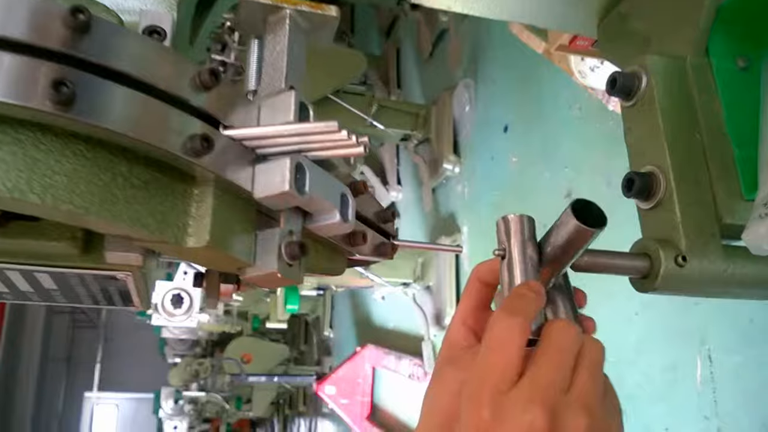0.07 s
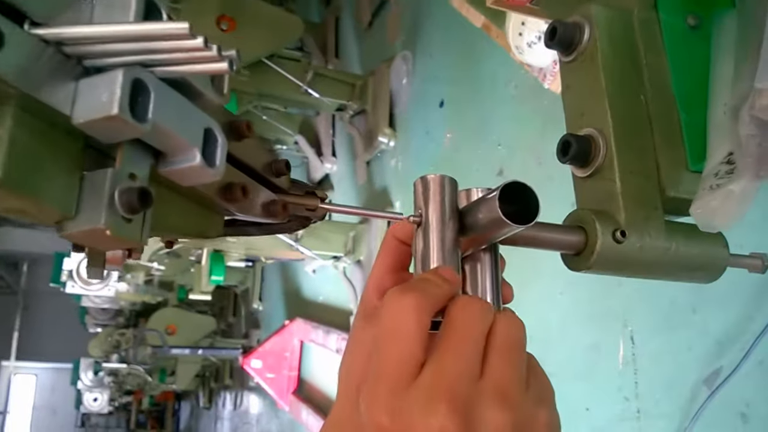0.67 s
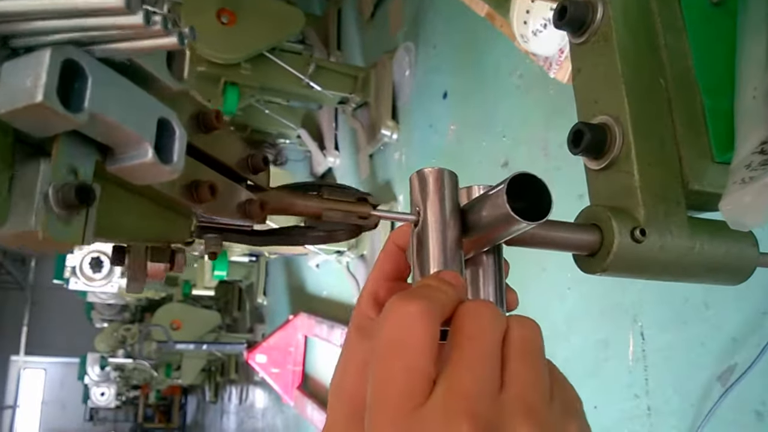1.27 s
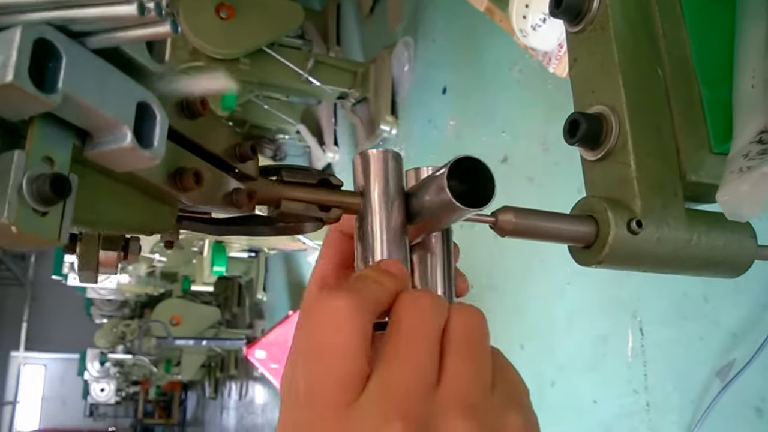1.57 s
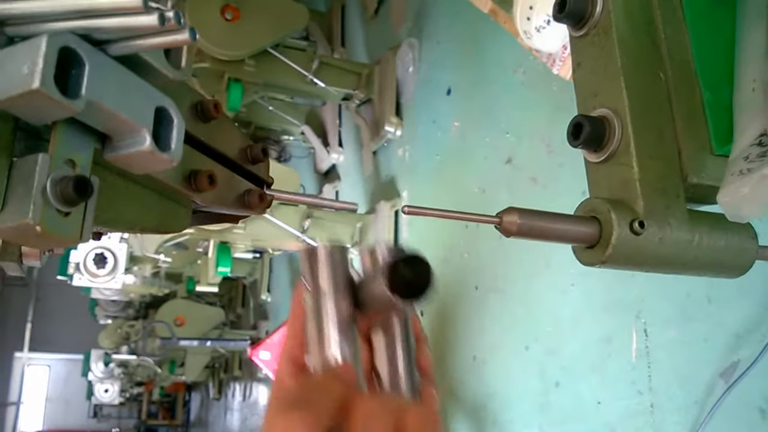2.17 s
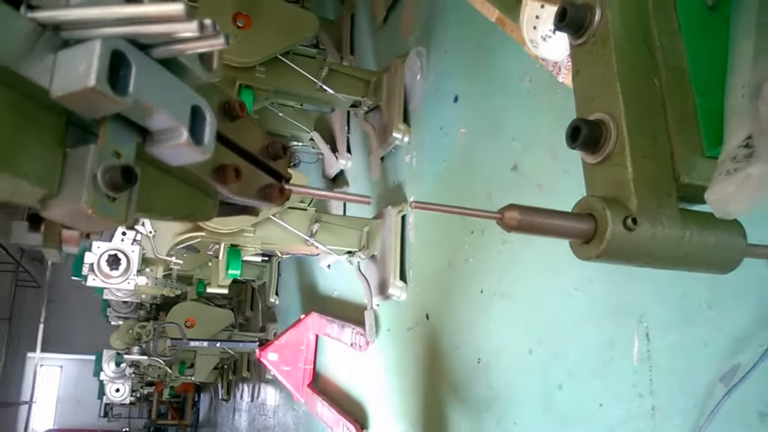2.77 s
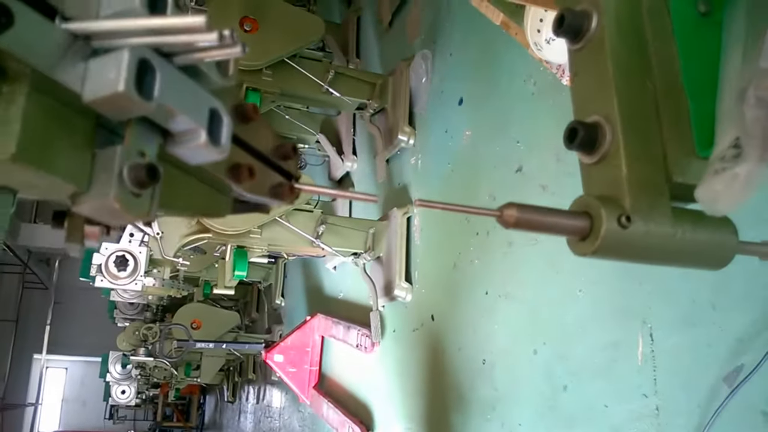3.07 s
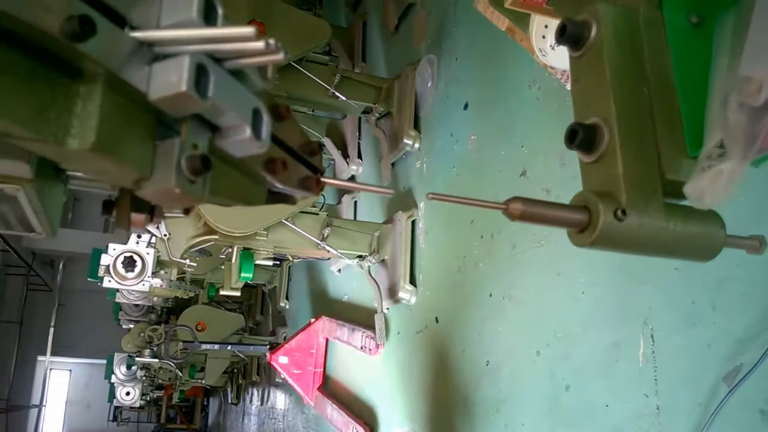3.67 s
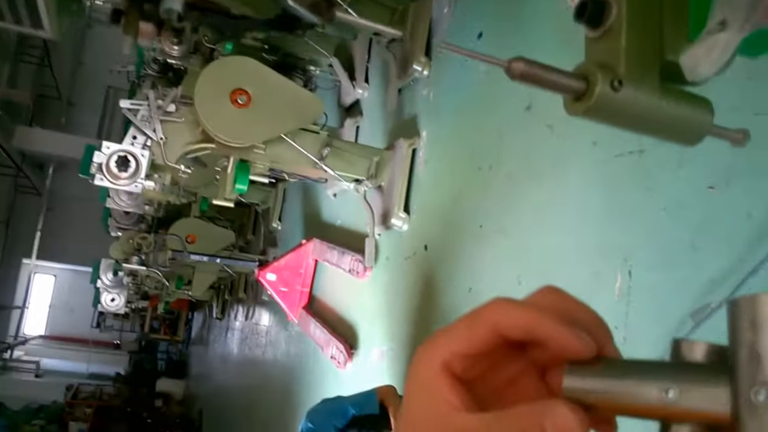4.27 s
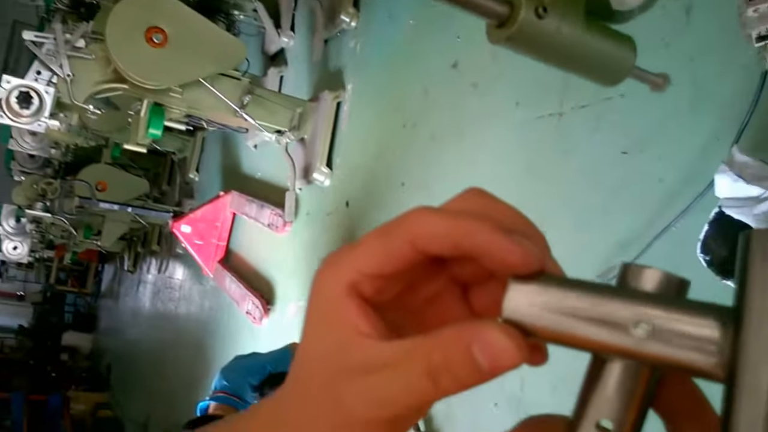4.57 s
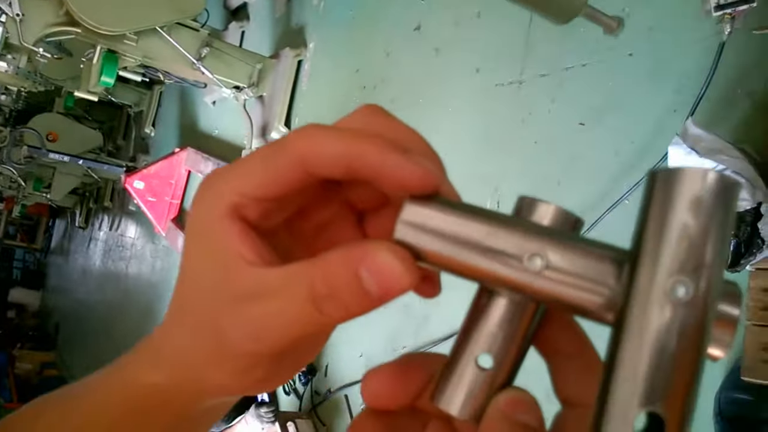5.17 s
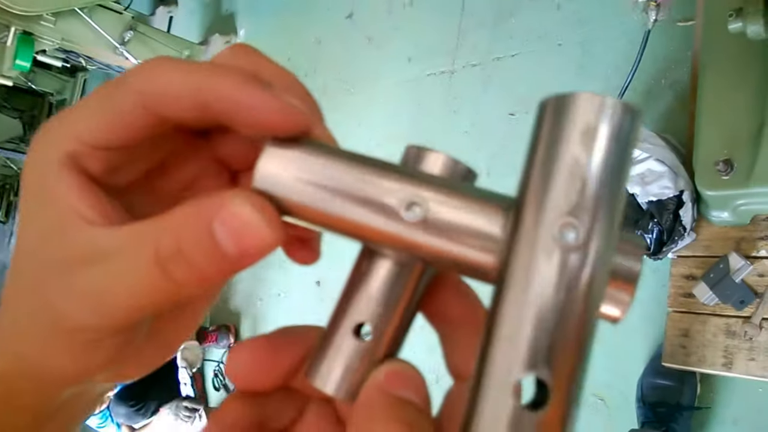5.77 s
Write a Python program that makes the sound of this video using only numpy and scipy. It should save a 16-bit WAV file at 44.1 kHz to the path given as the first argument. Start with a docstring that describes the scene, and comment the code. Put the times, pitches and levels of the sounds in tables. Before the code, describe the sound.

A riveting machine bangs and clatters through one stroke as steel tubes clink, while an angle grinder screeches further off in a workshop.

```python
"""A riveting machine runs through one stroke in a metal workshop: it bangs into motion, blows and loose
parts ring its iron frame, and hand-held steel tubes clink as they come off the pin. Further off an
angle grinder rasps and screeches on steel, slowing as it is pressed down. Two thin squeaks sound, then
the lifted grinder's brief whine. Under it all lie the wash of distant machines and a motor's low hum."""
import sys
import numpy as np
from scipy import signal
from scipy.fft import rfft, irfft
from scipy.io import wavfile
from scipy.ndimage import uniform_filter1d, map_coordinates

SR = 44100
rng = np.random.default_rng(int(sys.argv[2]) if len(sys.argv) > 2 else 0)


def bounce(signal):
    """Save signal as a 16-bit WAV file at the path given by the first command-line argument."""
    frames = np.transpose(np.atleast_2d(signal))
    limited = np.clip(frames, -1, 1)
    pcm = np.round(limited * 32767).astype(np.int16)
    wavfile.write(sys.argv[1], SR, pcm)


N = 265482
TIME_S = np.arange(N) / SR
FREQ_HZ = np.fft.rfftfreq(N, 1 / SR)

# Spindle speed, one list per pass. Each row: time in seconds, speed in turns per second.
SPINDLE_SPEEDS = [
    [(0.0, 115.0), (0.124, 115.0), (0.27, 111.7), (0.38, 111.2), (0.49, 112.7), (0.58, 116.2),
     (0.81, 118.0), (1.3, 119.0), (1.45, 121.0)],
    [(1.87, 138.5), (1.98, 137.2), (2.106, 132.6), (2.286, 124.6), (2.576, 116.6), (2.766, 113.6),
     (2.956, 112.0), (3.06, 112.3)],
    [(3.26, 132.4), (3.43, 133.4), (4.03, 122.8), (4.38, 118.3), (4.54, 113.8), (4.66, 115.5),
     (4.79, 113.2), (4.91, 115.5), (5.5, 113.5), (5.66, 111.4), (5.76, 111.9)],
]
# Grinder passes. Each row: touch and lift in seconds, screech in dB at zero and at full pressure,
# rasp in dB at full pressure, screech tilt in dB per order.
GRINDER_PASSES = [(0.0, 1.482, -46, -21, -29, 0.03), (1.894, 2.957, -36, -24.5, -30.5, 1.1),
                  (3.195, 5.76, -44.5, -24, -33, -0.37)]
# Uneven disc rim. Each row: order (multiple of the spindle rate), relative level in dB.
RIM_SPECTRUM = [(5, -25.5), (7, -17.5), (9, -19), (11, -31), (13, -20.5), (15, -17), (17, -25), (21, -9),
                (24, -19), (26, -5.5), (28, -14), (29, -6.5), (35, -21.5), (41, -16.5), (46, -31.5),
                (49, -15.5), (52, -20.5), (63, -18), (75, -17.5), (88, -18.5)]
# Disc screech. Each row: order, relative level in dB.
SCREECH_ORDERS = [(30, -14), (31, -7), (32, 0), (33, -2), (34, -3), (35, -6), (36, 1), (37, -1), (38, -5),
                  (39, -13), (40, -13)]
# Scrape that differs from turn to turn. Each row: order, relative level in dB.
SCRAPE_SPECTRUM = [(10, -38), (26, -18), (30, -11), (32, 0), (37, 0.5), (39, -9), (45, -11.5), (70, -39)]
# Grit hiss. Each row: frequency in Hz, relative level in dB.
GRIT_SPECTRUM = [(500, -33), (1200, -20), (2000, -4.5), (2700, 6.5), (4500, -1.5), (5600, 4), (6500, -1),
                 (8000, 1), (10500, -1)]
# Gear whine. Each row: order, level in dB.
GEAR_ORDERS = [(11, -51.5), (12, -58.5)]
# Distant machines. Each row: frequency in Hz, relative level in dB.
SHOP_SPECTRUM = [(20, -13), (45, -1.5), (70, -0.5), (130, -5), (250, 1.5), (450, -3), (700, -1),
                 (1100, -1.5), (1500, 0.5), (1950, 0), (2800, -1.5), (4500, -7), (10500, -16.5)]
# Motor hum. Each row: frequency in Hz, level in dB.
MOTOR_TONES = [(97.5, -58), (146, -63), (195, -70)]
# Blows on the machine and knocks around the shop. Each row: start in seconds, level in dB,
# hardness in dB per octave, rattle time constant in seconds.
BLOWS = [(0.313, -25.5, 0.5, 0.026), (1.135, -29.5, -1, 0.073), (1.3002, -14, -2.7, .012),
         (1.3435, -18, 2.5, 0.019), (1.382, -12, -1.5, .012), (1.395, -28, 3.5, 0.023),
         (1.403, -20.5, -2.5, 0.013), (1.428, -17.5, 5, 0.034), (1.448, -14, 4.5, 0.042),
         (1.467, -19.5, -1, 0.039), (1.497, -15.5, -3.2, .0084), (1.514, -14, 2.5, 0.023),
         (1.536, -21.5, -2.5, 0.042), (1.581, -33, -5.5, 0.027), (1.627, -16.5, 1.5, 0.0083),
         (1.69, -25, 3.5, 0.031), (1.727, -22, 1.5, 0.014), (1.775, -27, -.5, 0.15),
         (1.955, -26, 4.5, 0.018), (1.978, -22.5, -1.5, 0.0069), (1.987, -22.5, -2, 0.0038),
         (2.039, -28.5, -1, 0.0034), (2.0476, -19, -1, .005), (2.057, -27, -5, 0.0022),
         (2.125, -44, 3, 0.062), (2.197, -24.5, -1.5, 0.018), (4.46, -34, 7, 0.043), (5.475, -37, 3, 0.012),
         (5.818, -32.5, 4, 0.039), (5.928, -33.5, 1.5, 0.081)]
# Edges in Hz of a blow's five bands: boom, thud, clank, ring, tick.
BLOW_EDGES_HZ = [110, 280, 540, 2200, 4800, 10500]
# Tone of an average blow: relative level in dB of each band.
BLOW_BANDS_DB = [-18, -2, 2, -7.5, -12.5]
# Iron frame and linkage. Each row: frequency in Hz, relative level in dB, T60 in seconds.
FRAME_MODES = [(248.5, 2, 0.069), (303, -4, 0.1), (364, -4, 0.059), (389.7, -1, 0.088), (515.4, 2.5, 0.1),
               (624.8, 5, 0.094), (683.9, -3.5, 0.17), (923, -21, 0.16), (1174, -2.5, 0.056),
               (1186, -20.5, 0.034), (1579, -3.5, 0.03), (1694, 0.5, 0.026), (1797, -8.5, 0.039),
               (2146, -9.5, 0.021), (2833, 7.5, 0.05), (3297, 8, 0.018), (3300, -17, 0.034),
               (4090, -9, 0.038), (5540, -12, .03), (6460, 23.5, 0.015)]
# Tubes striking the pin and each other. Each row: start in seconds, level in dB,
# most excited frequency in Hz, reach around it in octaves, tuning factor.
TUBE_STRIKES = [(1.3458, 6, 3360, .4, 1.03), (1.4498, 6.5, 2900, 2.8, 0.93),
                (1.5176, 3.5, 6740, 0.89, 0.92), (1.631, -1, 3060, 1, 0.95),
                (1.7288, -2.5, 4500, 0.35, 0.99), (1.8737, 3, 3230, 7.2, 1.016),
                (1.9514, 2.5, 5060, 0.31, 0.94), (1.9875, -0.5, 7550, 2.8, 0.91),
                (2.1182, -12, 6150, 0.28, 0.97)]
# Hand-damped tube. Each row: frequency in Hz before tuning, relative level in dB, T60 in seconds.
TUBE_MODES = [(1630, -11, 0.022), (3190, 1, 0.047), (3370, 10.5, 0.006), (3840, -12, 0.051),
              (4900, -41, .02), (5590, -16, 0.022), (6100, 3.5, 0.0074), (6260, -13, 0.057),
              (8000, 4.5, 0.02), (10000, -11, 0.03)]
# Brief thin high tones: two squeaks, then the lifted grinder's whine.
# Each row: start in seconds, length in seconds, pitch in Hz, level in dB.
HIGH_TONES = [(2.3, 0.023, 10220, -28.5), (2.5, 0.048, 10240, -39), (3.23, .1, 5580, -40.5),
              (3.227, .1, 7980, -46.5), (3.213, 0.036, 10000, -43.5)]
# Room decay. Each row: frequency in Hz, T60 in seconds.
ROOM_DECAY = [(150, 0.37), (400, 0.8), (1500, 0.36), (4000, 0.62), (10000, 0.3)]


def amp(db):
    """Decibels to gain."""
    return 10 ** (np.asarray(db) / 20)


def unit(x):
    """Scales to rms 1."""
    return x / np.sqrt(np.mean(x ** 2) + 1e-20)


def log_interp(points, at):
    """Interpolates a table on a log frequency axis."""
    freqs, values = np.transpose(points)
    return np.interp(np.log(at + .01), np.log(freqs), values)


def shaped_noise(spectrum, axis=FREQ_HZ):
    """Noise with the given spectrum, rms 1."""
    return unit(irfft(rfft(rng.standard_normal(N)) * amp(log_interp(spectrum, axis)), N))


def drift(rate_hz):
    """Random wander, rms 1."""
    knots = rng.standard_normal(4000)
    return unit(np.interp(TIME_S * rate_hz, np.arange(len(knots)), knots))


def add(mix, start_s, sound):
    """Mixes a sound in at start_s."""
    part = mix[max(round(start_s * SR), 0):][:len(sound)]
    part += sound[:len(part)]


def spindle(free_rps=139.4, loaded_rps=110.96, spin_up_s=.38, inertia_s=0.12, hand_s=0.11):
    """Speed and the hand pressure it implies: load drags the disc down after a lag."""
    rows = [row for one_pass in SPINDLE_SPEEDS for row in one_pass]
    rows.append((rows[-1][0] + spin_up_s, free_rps))
    speed_rps = np.interp(TIME_S, *np.transpose(rows))
    target_rps = uniform_filter1d(speed_rps + inertia_s * np.gradient(speed_rps) * SR, round(hand_s * SR))
    pressure = np.clip((free_rps - target_rps) / (free_rps - loaded_rps), 0, 2)  # 1 = full
    return speed_rps, pressure


def disc_contact(pressure, bite_s=0.069, release_s=0.08, lifted_db=-13.5, rasp_range_db=5):
    """Each pass bites, holds and lets go; pressure mostly feeds the screech."""
    passes = np.array(GRINDER_PASSES)
    current = np.maximum(np.searchsorted(passes[:, 0], TIME_S) - 1, 0)
    touch_s, lift_s, light_db, pressed_db, rasp_db, tilt_db = passes[current].T
    contact = np.clip(np.minimum((TIME_S - touch_s) / bite_s, 1 - (TIME_S - lift_s) / release_s), 0, 1)
    gate_db = lifted_db * (1 - contact)
    screech_gain = amp(light_db + (pressed_db - light_db) * pressure + gate_db)
    rasp_gain = amp(rasp_db + rasp_range_db * (pressure - 1) + gate_db)
    return screech_gain, rasp_gain, tilt_db


def overtone(turns, order, waver):
    """One multiple of the spindle rate; shifting contact makes it swell and fade."""
    phase = 2 * np.pi * (order * turns + rng.random())
    return (1 + waver * drift(18)) * np.cos(phase)


def disc_screech(turns, tilt_db):
    """Each pass meets the steel at its own angle and favours higher or lower orders."""
    orders, levels_db = np.transpose(SCREECH_ORDERS)
    gains = np.array([amp(db + tilt_db * (k - orders.mean())) for k, db in zip(orders, levels_db)])
    tones = sum(gain * overtone(turns, k, waver=0.77) for k, gain in zip(orders, gains))
    return unit(tones / np.linalg.norm(gains, axis=0))


def disc_scrape(turns, mean_rps):
    """Noise laid out along the rim's path, so its colour falls with the speed."""
    surface = shaped_noise(SCRAPE_SPECTRUM, FREQ_HZ / mean_rps)
    return map_coordinates(surface, [turns / turns[-1] * (N - 1)], order=3)


def grinder(scrape_db=-5.5, hiss_db=-1.0, chatter=0.3, flutter_db=1.2):
    """The rim strikes the steel alike each turn; loose grit scrapes and hisses; the gears whine."""
    speed_rps, pressure = spindle()
    screech_gain, rasp_gain, tilt_db = disc_contact(pressure)
    speed_rps *= 1 + 0.00086 * drift(40)
    turns = np.cumsum(speed_rps) / SR
    rim = unit(sum(amp(log_interp(RIM_SPECTRUM, k)) * overtone(turns, k, waver=0.63)
                   for k in range(5, 90)))
    tones = disc_screech(turns, tilt_db)
    scrape = disc_scrape(turns, speed_rps.mean())
    bite = unit(1 + chatter * np.cos(2 * np.pi * turns) + 0.068 * drift(600))
    screech = screech_gain * unit(tones + amp(scrape_db) * scrape * bite)
    rasp = rasp_gain * (rim + amp(hiss_db) * shaped_noise(GRIT_SPECTRUM) * bite)
    gears = sum(amp(db) * unit(overtone(turns, k, waver=0.21)) for k, db in GEAR_ORDERS)
    return amp(flutter_db * drift(35)) * (screech + rasp) + gears


def distant_machines(level_db=-38, width=0.23):
    """A stereo wash of noise, its level flickering slightly."""
    mid, side = (shaped_noise(SHOP_SPECTRUM) * amp(0.42 * drift(30)) for _ in range(2))
    return amp(level_db) * np.array([mid + width * side, mid - width * side])


def motor_hum():
    """Low tones wavering in level and phase."""
    out = np.zeros(N)
    for hz, db in MOTOR_TONES:
        swell = 1 + 0.21 * drift(4.8)
        out += amp(db) * unit(swell * np.sin(2 * np.pi * hz * TIME_S + .4 * drift(9.7)))
    return out


def riveter(crack=2.38, grain=0.39, first_contact=4.14, spread_s=.03):
    """One contact and a rattle of loose parts ring the frame; harder blows are brighter."""
    out, t = np.zeros(N), np.arange(SR // 3) / SR
    bands_hz = list(zip(BLOW_EDGES_HZ, BLOW_EDGES_HZ[1:]))
    filters = [signal.butter(2, edges, "band", fs=SR, output="sos") for edges in bands_hz]
    octaves = np.log2(bands_hz).mean(axis=1)
    for start_s, level_db, hardness_db_oct, rattle_s in BLOWS:
        # Each blow lands on another part, so the mode phases differ.
        frame = sum(amp(db - 60 * t / t60_s) * np.sin(2 * np.pi * (hz * t + rng.random()))
                    for hz, db, t60_s in FRAME_MODES)
        frame[0] += crack * np.linalg.norm(frame) / 2  # bare contact
        noise, log_sizes = rng.standard_normal((2, len(t)))
        contacts = noise * np.exp(grain * log_sizes) * np.exp(-t / rattle_s)
        contacts[0] += first_contact
        blow = signal.fftconvolve(contacts, frame)[:len(t)]
        bands_db = level_db + hardness_db_oct * (octaves - octaves[2]) + BLOW_BANDS_DB
        for sos, db in zip(filters, bands_db):
            band = signal.sosfilt(sos, blow)
            # Level is the band's energy spread over spread_s.
            add(out, start_s, amp(db) * band / np.linalg.norm(band) * np.sqrt(spread_s * SR))
    return out


def tube_clinks(tick_gain=0.25, tick_s=0.0023, tick_hz=1400, echo_s=0.016, echo_db=-15):
    """The contact point picks which tube modes ring; the machine's body reflects the clink."""
    out, t = np.zeros(N), np.arange(SR // 8) / SR
    highpass = signal.butter(2, tick_hz, "high", fs=SR, output="sos")
    for start_s, level_db, centre_hz, reach_oct, tuning in TUBE_STRIKES:
        ring = np.zeros(len(t))
        for hz, db, t60_s in TUBE_MODES:
            drive = 1 / (1 + (np.log2(hz / centre_hz) / reach_oct) ** 2)
            ring += drive * amp(db - 60 * t / t60_s) * np.sin(2 * np.pi * (tuning * hz * t + rng.random()))
        tick = signal.sosfilt(highpass, rng.standard_normal(len(t)) * np.exp(-t / tick_s))
        clink = ring / abs(ring).max() + tick_gain * tick
        add(out, start_s, amp(level_db) * clink)
        add(out, start_s + echo_s, amp(level_db + echo_db) * clink)
    return out


def squeaks_and_whine():
    """Brief thin high tones that waver, swell and fade."""
    out = np.zeros(N)
    for start_s, length_s, hz, db in HIGH_TONES:
        pitch_hz = hz * (1 + 0.012 * drift(370))
        tone = np.sin(2 * np.pi * np.cumsum(pitch_hz) / SR)
        swell = np.hanning(int(length_s * SR))
        add(out, start_s, amp(db) * unit(tone[:len(swell)] * swell))
    return out


def room(x, wet_db, width, spread_hz=6500):
    """Direct sound plus dense reflections; left and right differ most in the treble."""
    taps = rng.standard_normal((2, SR)) * (rng.random((2, SR)) < .1)
    taps[:, :SR // 200] = 0  # 5 ms pre-delay
    hz, t, spectra = signal.stft(taps, SR, nperseg=256)
    spectra[1] *= 1 + (hz[:, None] / spread_hz) ** 3
    decay = amp(-60 * t / log_interp(ROOM_DECAY, hz)[:, None])
    tail = signal.istft(spectra * decay, SR, nperseg=256)[1]
    mid, side = signal.fftconvolve(x[None], tail / np.linalg.norm(tail[0]), axes=1)[:, :N]
    wet = amp(wet_db)
    return (x + wet * np.array([mid + width * side, mid - width * side])) / np.hypot(1, wet)


def scene():
    """Machine and tubes close by, grinder across the room."""
    far = room(grinder() + squeaks_and_whine(), wet_db=-7, width=.2)
    machine = room(riveter(), wet_db=-5.0, width=0.17)
    tubes = room(tube_clinks(), wet_db=-13, width=.3)
    return far + machine + tubes + distant_machines() + motor_hum()


def record(dry, ceiling=0.67, open_s=0.0565, cutoff_hz=10620):
    """Quick fade-in, soft clip, low-pass."""
    fade_in = np.interp(TIME_S, [.036, .042, open_s - .001, open_s + .001], [0, .08, .12, 1])
    clipped = ceiling * np.tanh(dry * fade_in / ceiling)
    lowpass = signal.firwin(401, cutoff_hz, window=("kaiser", 8), fs=SR)
    return signal.oaconvolve(clipped, lowpass[None], "same")


dry = scene()
out = record(dry)
bounce(out)
```